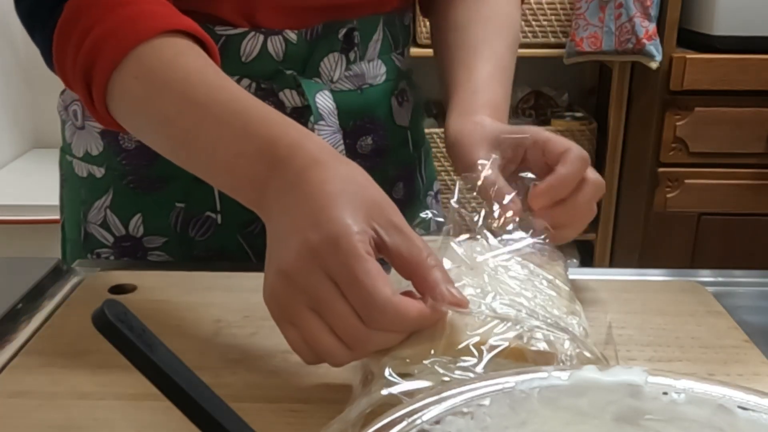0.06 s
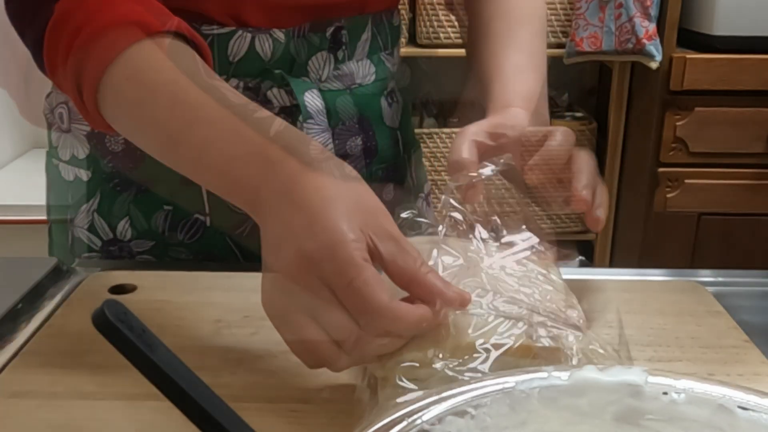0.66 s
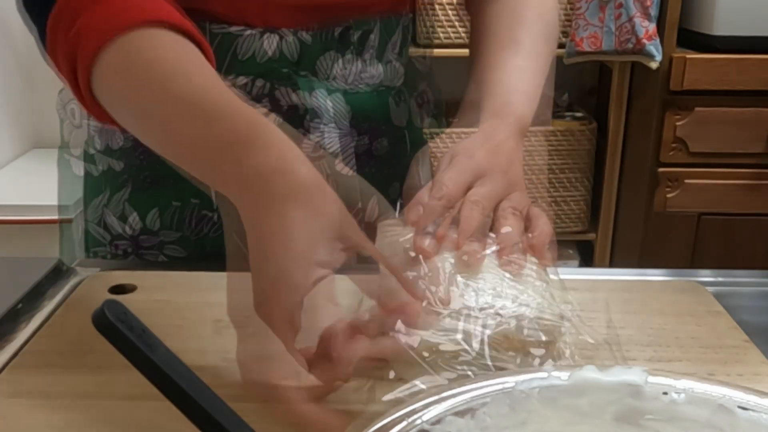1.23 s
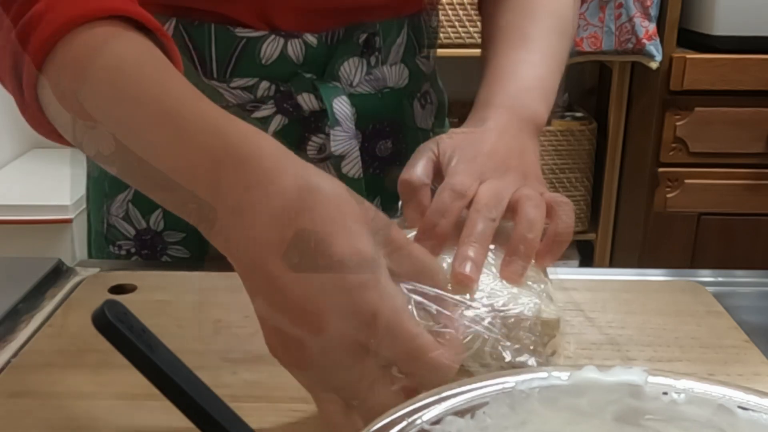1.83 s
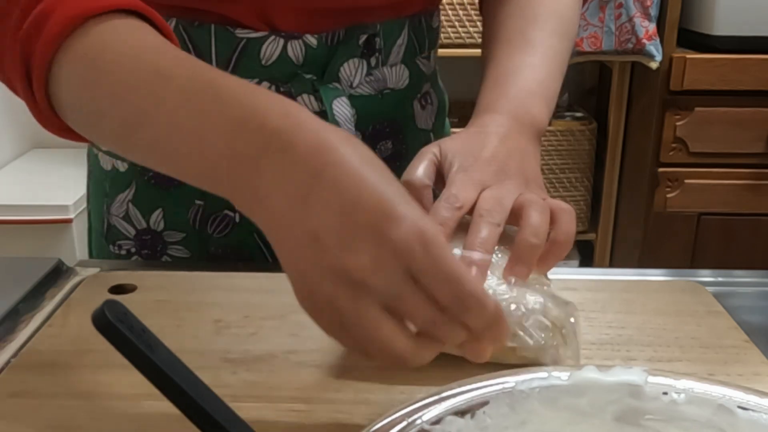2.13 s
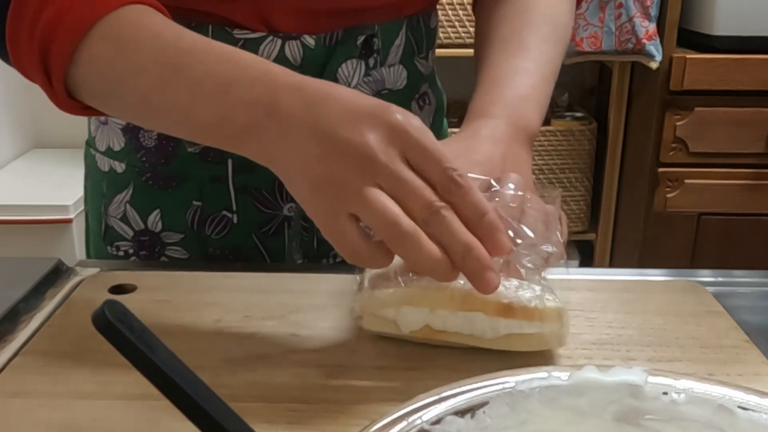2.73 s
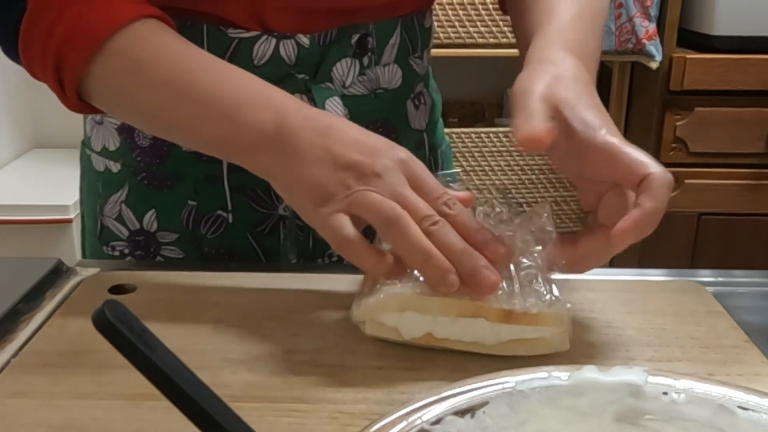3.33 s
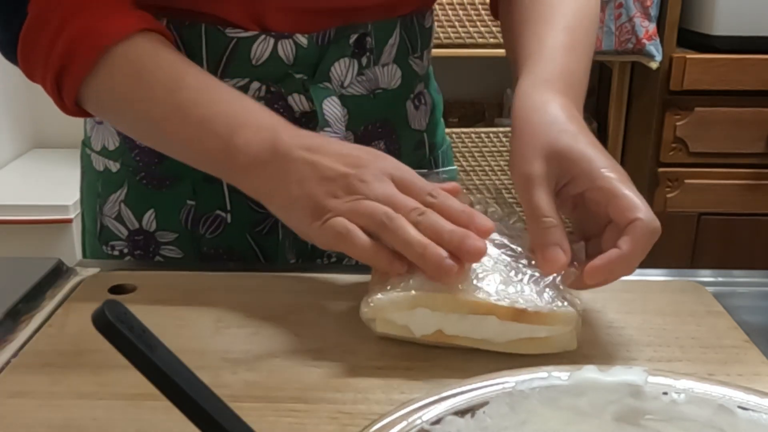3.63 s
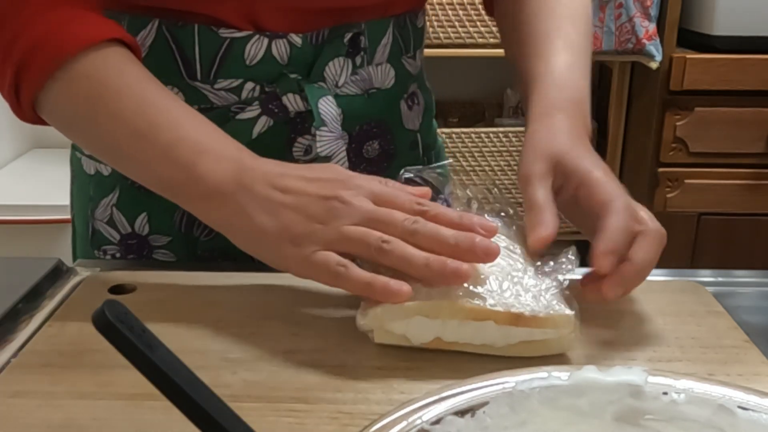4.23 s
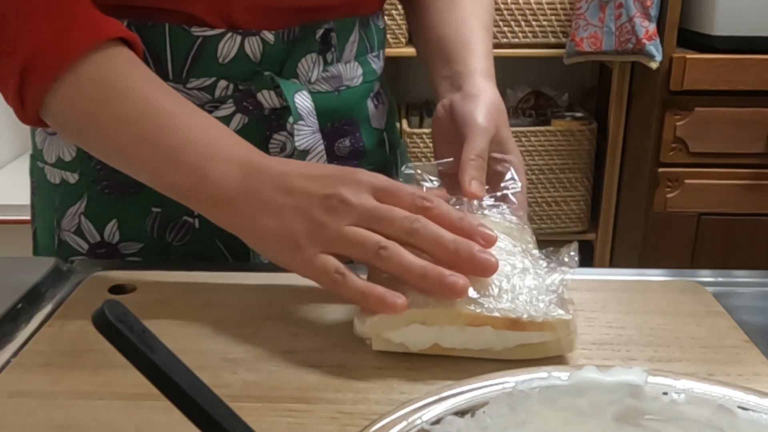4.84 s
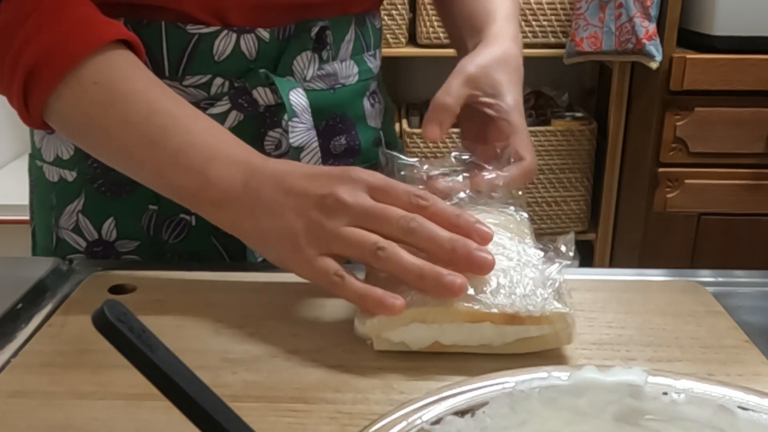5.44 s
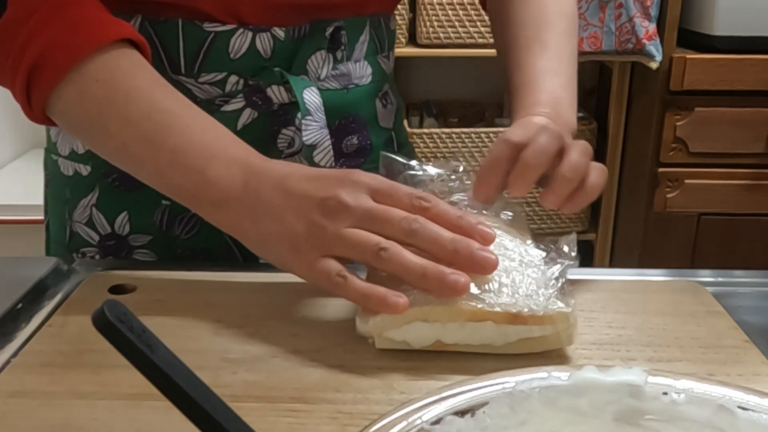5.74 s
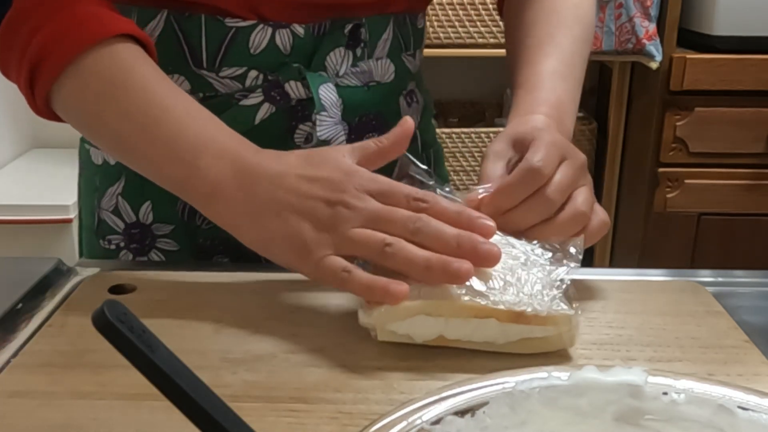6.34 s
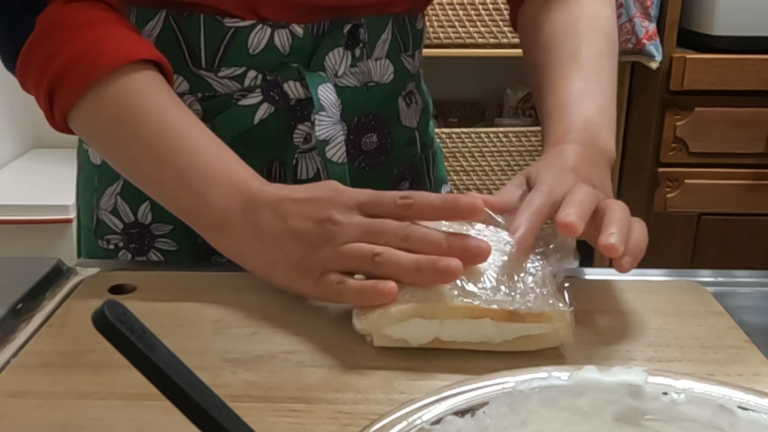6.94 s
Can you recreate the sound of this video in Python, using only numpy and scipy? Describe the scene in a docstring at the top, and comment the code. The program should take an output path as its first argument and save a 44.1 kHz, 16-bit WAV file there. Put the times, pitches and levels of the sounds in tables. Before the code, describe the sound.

Plastic cling film crinkles and snaps in uneven bursts as hands wrap a sandwich, over a steady low appliance hum.

```python
"""Wrapping a sandwich in cling film

A wooden board in a small kitchen, close up on a stereo pair. As the film is drawn tight, its creases
buckle in swarms of tiny clicks and sharper snaps, and the stretched sheet rings. Fingers rub and pat
the wrapped bread and shove it over the board. Behind it an appliance hums in the room's low rumble,
and the work table is nudged twice."""
import sys
import numpy as np
from scipy import signal
from scipy.fft import rfft, irfft, next_fast_len
from scipy.io import wavfile
from scipy.ndimage import uniform_filter1d

SR = 44100
rng = np.random.default_rng(int(sys.argv[2]) if len(sys.argv) > 2 else 0)


def bounce(signal):
    """Save signal as a 16-bit WAV file at the path given by the first command-line argument."""
    frames = np.transpose(np.atleast_2d(signal))
    limited = np.clip(frames, -1, 1)
    pcm = np.round(limited * 32767).astype(np.int16)
    wavfile.write(sys.argv[1], SR, pcm)


N = 308259
SPOTS = 4  # places on the parcel that sound, one signal row each


def film(level_db, body_db):
    """A harder pull buckles more creases; the sheet answers lower down, the finest fizz on top."""
    # How tight the wrap is. Each row: time in seconds, tension from 0 to 1.
    tension = [(0, 0.37), (1.9, 0.39), (2.8, 0.58), (3.6, 0.38), (4.8, 0.73), (6.9, 0.7)]
    # Added treble of the finest creases. Each row: time in seconds, gain in dB.
    fizz = [(0, -11), (.8, -4), (1.15, -8), (1.34, -17), (1.46, 3), (1.7, -8), (2.2, -11), (2.55, -8),
            (2.95, -13), (3.3, -11), (3.58, -2), (4.1, -19), (4.7, -13), (5.5, -9), (5.8, -10), (6.35, -18),
            (6.9, -5)]
    # Tone of the crinkle and the lower rustle, including the recorder's colouring.
    # Each row: frequency in Hz, gain in dB.
    crinkle_eq = [(1200, -15), (2300, -10.5), (3400, -0.5), (5000, -1.5), (5900, -1.5), (7600, 0),
                  (8200, -4.5), (10800, -3), (13500, -15), (15000, -49.5)]
    rustle_eq = [(400, -9), (700, -6.5), (900, -12.5), (1150, -7), (1400, -3.5), (1750, -5.5), (2400, -6.5),
                 (3600, -13)]
    # Resonances of the stretched film. Each row: frequency in Hz, width in Hz, gain in dB.
    taut_modes = [(1006, 59, -11), (1300, 42, 1.5), (1517, 82, -2), (1808, 68, -0.5), (2080, 310, -9.5),
                  (2470, 340, -4), (3340, 90, -4), (3580, 100, -1.5), (4520, 98, -1), (4650, 130, -1),
                  (5120, 310, 0.5)]
    usual_pull_db, creases_follow = -67, 0.55
    taut = in_time(tension)
    busy = from_db(creases_follow * (level_db - usual_pull_db))
    creases = swarm(500 * busy, spread_db=2, clump_db=5, low_hz=2000, high_hz=14300, cycles=3.6)
    # a few larger facets ring long enough to be heard one by one
    facets = swarm(45 * busy, spread_db=2, clump_db=3, low_hz=2080, high_hz=7930, cycles=9.5, count=27)
    fine = creases + from_db(4) * facets
    broad = swarm(600 * busy, spread_db=2.5, clump_db=4, low_hz=765, high_hz=3200, cycles=4.7)
    top = coloured(fine, [(6000, -30), (9500, 0)])
    crinkle = evened(coloured(fine + from_db(in_time(fizz)) * top, crinkle_eq))
    # slack film flaps broadly; stretched, it rings like a drumhead that the shifting grip detunes
    slack = rms_one(coloured(broad, rustle_eq))
    drum = sum((-1) ** k * from_db(db) * resonance(broad + fine, hz, width)
               for k, (hz, width, db) in enumerate(taut_modes))
    stretched = rms_one(wavering(drum, share=0.01596, rate_hz=7))
    body = evened((1 - taut) * slack + taut * stretched)
    # tension damps the crinkle a little and lifts the body
    return from_db(level_db - 0.95 * taut) * crinkle + from_db(body_db + 0.5 * taut) * body


def swarm(per_s, spread_db, clump_db, low_hz, high_hz, cycles, count=18):
    """Little avalanches of clicks, each click with its own size and one of `count` pitches."""
    chance = per_s * from_db(clump_db * drift(rate_hz=130)) / SR
    born = np.flatnonzero(rng.random(N) < chance)
    sizes = from_db(spread_db * np.minimum(rng.exponential(1, N)[born], 4))
    sizes *= rng.choice([-1, 1], N)[born]
    pitch_index = rng.integers(0, count, N)[born]
    out = np.zeros((SPOTS, N))
    for k, hz in enumerate(np.geomspace(low_hz, high_hz, count)):
        clicks = np.bincount(born, sizes * (pitch_index == k), N)
        out[k % SPOTS] += np.sqrt(hz) * buckle(clicks, hz, cycles)
    return out


def buckle(clicks, hz, cycles):
    """A facet flips and rings a few cycles; it radiates its speed, so no net air is moved."""
    return np.diff(ring(clicks, hz, cycles / hz), prepend=0) / (2 * np.sin(np.pi * hz / SR))


def big_snaps():
    """The big creases snap through one by one."""
    # Each row: start in seconds, peak at the film in dB, pitch in Hz, cycles of ringing.
    big_creases = [(0.0602, -45.5, 3700, 2), (0.1219, -37, 3920, 7.5), (0.2503, -40.5, 4200, 7),
                   (0.2996, -42, 5600, 2.5), (0.39, -37, 4230, 1.3), (0.3947, -34.5, 3680, 3.9),
                   (0.4213, -36, 4400, 3.7), (0.5085, -44.5, 6250, 4.6), (0.5195, -46, 5470, 4),
                   (0.5744, -43, 6700, 2.2), (0.6248, -51.5, 1300, 7), (0.6285, -49, 4700, 9.2),
                   (0.7243, -51.5, 2680, 3.5), (0.8663, -46, 1550, 1.8), (1.079, -49.5, 2000, 1.3),
                   (1.2186, -44.5, 5200, 1.2), (1.2625, -43, 6260, 1), (1.2966, -42, 5600, 1.6),
                   (1.3097, -61, 6400, 3), (1.3495, -41, 3100, 1.6), (1.428, -41, 3650, 3),
                   (1.466, -46, 6500, 2.3), (1.4788, -47, 5600, 0.76), (1.6106, -57, 2700, 1.5),
                   (1.6547, -42.5, 7200, 1.9), (1.78, -46.5, 2900, 2.2), (1.8393, -40, 2240, 2.2),
                   (2.0068, -47, 4700, 1.3), (2.3501, -33.5, 2570, 1.6), (2.4477, -56, 3570, 4),
                   (2.4922, -43, 3680, 2.5), (2.5604, -40, 3100, 2.5), (2.714, -49, 7100, 2.5),
                   (2.7423, -47.5, 6500, 1.3), (2.7859, -45.5, 1340, 4.5), (2.953, -47.5, 3200, 3),
                   (3.0412, -39.5, 3700, 3), (3.0418, -44.5, 6500, 9.3), (3.0857, -48, 5700, 1.8),
                   (3.1339, -39, 5000, 3.5), (3.2965, -44, 4020, 0.75), (3.3048, -50, 1350, 1.9),
                   (3.449, -50.5, 4600, 2.4), (3.479, -54.5, 5530, 3.4), (3.519, -57, 4000, 4.3),
                   (3.5538, -41.5, 3880, 11), (3.5792, -37.5, 3700, 9), (3.6572, -48, 4000, 1.9),
                   (3.707, -43, 7200, 2.7), (3.7273, -38.5, 5700, 5.7), (3.7377, -50, 5500, 4),
                   (4.0372, -45, 1620, 4), (4.0385, -42, 2700, 12), (4.1218, -44, 8400, 9),
                   (4.1624, -50, 5850, 1.4), (4.258, -42, 4300, 7.2), (4.2858, -38, 6040, 0.75),
                   (4.6272, -47, 3200, 6), (4.65, -43.5, 2570, 7.7), (4.824, -52, 5000, 5.3),
                   (4.855, -46, 2550, 8.7), (4.9197, -51, 2000, 7.4), (5.024, -44, 3600, 2.6),
                   (5.057, -52, 2380, 3), (5.254, -56.5, 1410, 9.4), (5.4574, -42, 4460, 6.6),
                   (5.547, -46.5, 6500, 5.6), (5.711, -51, 6700, 6.3), (5.6145, -44, 2470, 2.3),
                   (5.6376, -50, 4250, 3.3), (5.846, -44.5, 4850, 10), (5.8527, -49, 3800, 10),
                   (5.9286, -46, 4600, 1.8), (5.9633, -43.5, 4100, 3.5), (5.9874, -45.5, 2800, 3.4),
                   (6.0205, -48, 4360, 4.4), (6.0555, -46, 4080, 7.3), (6.1173, -47, 7300, 3.4),
                   (6.1625, -52, 6300, 4), (6.667, -46, 3580, 2.1), (6.8525, -51, 4430, 8.1),
                   (6.915, -49, 4870, 6.7), (6.944, -49, 2500, 4)]
    return snaps(big_creases)


def lesser_snaps(level_db, count=30, above_db=18.5, centre_hz=4600, cycles=2.3):
    """Lesser creases snap by chance, as strong as the pull, within an octave of the centre pitch."""
    return snaps([(when * N / SR, level_db[int(when * N)] + above_db,
                   centre_hz * 2 ** (2 * pitch - 1), cycles)
                  for when, pitch in rng.random((count, 2))])


def snaps(rows, size=2048):
    """Each crease gives one damped pulse; the lower its pitch, the softer its edge."""
    # Tone of the snaps, including the recorder's colouring. Each row: frequency in Hz, gain in dB.
    snap_eq = [(300, 3.5), (900, 0.5), (1400, 6.5), (2000, 1.5), (3700, -1), (7600, -2.5), (8200, -5.5),
               (12000, -5.5), (15000, -19)]
    out, click = np.zeros((SPOTS, N + size)), signal.unit_impulse(size)
    for k, (s, peak_db, hz, cycles) in enumerate(rows):
        softened = lowpass(buckle(click, hz, cycles), min(3.15 * hz, SR / 3))
        pulse = coloured(softened, snap_eq)
        at = int(s * SR)
        out[k % SPOTS, at:at + size] += from_db(peak_db) * pulse / np.abs(pulse).max()
    return out[:, :N]


def hands():
    """Levels in dB that drive crinkle, sheet body and finger rub; the strongest movement leads."""
    # Light handling between tugs. Each row: time in seconds, crinkle level in dB.
    handling = [(0, -82.5), (.055, -83.5), (.1, -73), (.3, -68), (.66, -76), (.93, -82.5), (1.3, -74.5),
                (1.52, -100), (2.25, -70), (2.85, -71), (3.1, -75), (3.4, -72), (3.46, -86), (3.51, -81),
                (3.7, -73.5), (4.2, -75.5), (4.33, -69.5), (4.44, -82.5), (4.48, -84.5), (4.72, -72),
                (5.36, -83), (5.6, -78.5), (5.7, -80), (5.78, -76), (6.3, -75), (6.6, -79), (6.7, -72.5),
                (6.99, -73.5)]
    # Tugs on the film. Each row: start, attack, length and release in seconds,
    # crinkle level in dB, then body and rub in dB relative to it.
    tugs = [(0.109, 0.023, 0.018, 0.17, -64, -3.5, -6), (0.202, 0.17, 0.1, .13, -62.5, -3.5, -7.5),
            (0.344, 0.071, 0.065, 0.16, -65, -3.5, -5.5), (0.435, .08, 0.14, 0.13, -70, -4, -7),
            (0.714, 0.037, 0.013, .09, -77, 0, 5), (0.766, .05, 0.02, 0.085, -70, -3, -3),
            (0.862, 0.05, 0.006, 0.037, -65.5, -3, -1), (0.989, 0.097, 0.075, 0.12, -74, -5, -10),
            (1.206, 0.088, .013, .14, -69.5, -3, -6), (1.34, 0.18, 0.013, 0.09, -61.5, -1.5, -4.5),
            (1.428, 0.14, 0.04, 0.058, -59.5, -3, -8), (1.579, 0.083, 0.025, 0.18, -75.5, 2, 1),
            (1.67, 0.075, 0.051, 0.088, -65.5, -5, -4), (1.777, 0.083, 0.089, .17, -69.5, -3, -2),
            (1.849, 0.027, 0.045, 0.06, -63, -2, -4.5), (1.968, 0.069, 0.035, 0.32, -68.5, 0, 2.5),
            (2.092, 0.24, 0.073, 0.46, -64, -2.5, -5.5), (2.365, .04, 0.08, 0.32, -65, -4.5, -4),
            (2.5, .08, 0.14, .17, -69, -3.5, -5), (2.745, 0.026, 0.082, 0.16, -67, -4, -10),
            (3.304, 0.044, 0.1, 0.13, -69, -9.5, -9), (3.519, .035, 0.019, 0.045, -66, -7, -7),
            (3.549, .03, 0.033, 0.13, -60.5, -4, -8), (3.615, .08, 0.076, 0.45, -64.5, -8, -20),
            (3.774, 0.11, 0.027, 0.11, -65, -6, -18), (3.851, 0.12, 0.021, 0.18, -66, -4, -12),
            (3.919, .08, 0.15, 0.14, -69, -6.5, -15), (4.275, 0.017, 0.014, 0.1, -59.5, -7, -9.5),
            (4.491, 0.045, 0.008, 0.07, -74, -4, 1.5), (4.549, .04, 0.011, 0.16, -74, -3, -7),
            (4.627, 0.065, 0.017, 0.39, -66.5, 0.5, -0.5), (4.847, 0.056, 0.033, 0.14, -70.5, 2.5, -3),
            (4.923, .08, 0.19, 0.44, -69, -1.5, -6), (5.201, 0.045, 0.065, 0.23, -67.5, -1.5, -6.5),
            (5.435, 0.17, 0.055, 0.16, -66.5, 0, -8.5), (5.545, 0.059, 0.087, 0.15, -70.5, -2.5, -7),
            (5.833, 0.12, 0.027, 0.28, -69, 0, -2.5), (5.9, .08, 0.14, 0.1, -72, -1.5, -7),
            (6.15, 0.084, 0.086, 0.16, -66.5, -1.5, -9), (6.222, .08, 0.018, .1, -67, -3, 2),
            (6.896, .08, 0.041, .17, -70, -3.5, -11)]
    levels = in_time(handling) + [[0], [-5.5], [-6]]  # crinkle, body, rub
    for start, attack, length, release, level_db, body_db, rub_db in tugs:
        tug_db = level_db + stroke(start, length, attack, release)
        levels = np.maximum(levels, tug_db + [[0], [body_db], [rub_db]])
    return levels + drift(rate_hz=22.254)  # unsteady by about 1 dB


def stroke(start, length, attack=0.055, release=0.24):
    """Level in dB of one hand movement: a rise up to its start, a hold that builds, a release."""
    times = [start - attack, start, start + length, start + length + release]
    return np.interp(np.arange(N) / SR, times, [-40, -1.5, 0, -40], left=-np.inf, right=-np.inf)


def fingers(level_db):
    """Skin sticks and slips on the film; the soft bread keeps it dull."""
    # Tone of the wrapped bread. Each row: frequency in Hz, gain in dB.
    parcel_tone = [(150, -8), (300, 2), (400, 0.5), (510, 2.5), (620, -6.5), (800, -17.5), (1400, -31)]
    slips = swarm(350, spread_db=5, clump_db=1, low_hz=212, high_hz=1220, cycles=4.4, count=12)
    return from_db(level_db) * evened(coloured(slips, parcel_tone))


def pats(mode_ratio=2.9, size=4096):
    """A fingertip lands on the soft parcel: a dull knock of two short modes."""
    # Each row: start in seconds, strength in dB, pitch of the lower mode in Hz.
    landings = [(0.4725, -48.5, 900), (0.866, -49, 580), (1.122, -56, 570), (1.264, -54, 534),
                (1.395, -50, 470), (1.426, -50, 580), (1.71, -49.5, 490), (1.8415, -43, 337),
                (1.872, -44, 387), (1.988, -49, 444), (2.185, -48.5, 366), (2.35, -44.5, 457),
                (2.414, -56, 480), (2.625, -59, 460), (2.71, -55, 440), (2.786, -54, 480),
                (3.042, -66, 530), (3.579, -39.5, 870), (3.683, -59, 480), (4.279, -53, 473),
                (5.615, -47.5, 476), (5.892, -57, 395), (6.223, -56, 440), (6.232, -51, 514)]
    out, click = np.zeros((SPOTS, N + size)), signal.unit_impulse(size)
    for k, (s, db, hz) in enumerate(landings):
        knock = buckle(click, hz, cycles=4.3) + buckle(click, hz * mode_ratio, cycles=2.1)
        at = int(s * SR)
        out[k % SPOTS, at:at + size] += from_db(db) * lowpass(knock, hz=1300)
    return out[:, :N]


def slide():
    """The parcel judders across the wood, and the board answers with a low murmur."""
    # Each row: start in seconds, length in seconds, level in dB.
    shoves = [(0.07, 0.16, -63.5), (1.825, 0.022, -67.5), (4.275, 0.022, -69)]
    # The board's two low modes in Hz.
    board_hz = [200, 248]
    push = sum(from_db(db + stroke(start, length)) for start, length, db in shoves)
    judder = rng.standard_normal((SPOTS, N))
    board = sum(resonance(judder, hz, width_hz=7.1) for hz in board_hz)
    return push * evened(lowpass(board, hz=400), size=4096)


def kitchen(spots):
    """Each spot reaches the pair directly and in echoes off the hands, the furniture and the room."""
    heard = 0
    for x, pan_db in zip(spots, np.linspace(-0.37, 0.37, SPOTS)):
        near = reflections(level_db=-2.5, delay_s=0.00039, t60=0.015)
        furniture = reflections(level_db=-1, delay_s=0.0029, t60=0.037)
        room = reflections(level_db=-5, delay_s=0.008, t60=0.21)
        response = near + furniture + room
        response[:, 0] += from_db([pan_db, -pan_db])  # direct path
        heard = heard + signal.oaconvolve(x[None], uncoloured(response), axes=1)[:, :N]
    return heard


def reflections(level_db, delay_s, t60, size=16384):
    """A burst of scattered echoes arrives after a delay and dies away."""
    t = np.arange(size) / SR
    echoes = diffuse(size) * from_db(-60 * t / t60) * (t > delay_s)
    return from_db(level_db) * rms_one(echoes) / np.sqrt(size)


def diffuse(size):
    """Stereo noise from all round: alike in the bass, less so in the treble."""
    # Each row: frequency in Hz, left-right likeness from 0 to 1.
    likeness = [(25, 0.99), (60, 1), (150, 1), (300, 0.99), (600, 0.79), (1200, 0.34), (2500, 0.57),
                (4500, 0.72), (9000, 0.66), (11500, .03)]
    alike = at_hz(likeness, size)
    mid, side = rfft(rng.standard_normal((2, size)))
    return irfft(np.sqrt((1 + alike) / 2) * mid + np.sqrt((1 - alike) / 2) * side * [[1], [-1]], size)


def microphones(x):
    """The two microphones hear unequally, most of all in the high treble."""
    # Each row: frequency in Hz, left minus right in dB.
    balance = [(300, 1.5), (900, -2.5), (1300, 0), (2000, 1), (3500, -0.7), (6000, 0.5), (9000, 1),
               (11000, 1), (12500, 7.5), (15000, 2)]
    size = next_fast_len(2 * (N // 2) + 4096)
    half_db = at_hz(balance, size) / 2
    return irfft(rfft(x, size) * from_db([half_db, -half_db]), size)[:, :N]


def table():
    """The nudged table sways with a deep, soft thud."""
    # Each row: start in seconds, level in dB, pitch in Hz, seconds to fall 60 dB.
    nudges = [(1.27, -57, 32.2, 1), (4.296, -41.5, 36.2, 0.59)]
    return sum(from_db(db) * ring(signal.unit_impulse(N, int(s * SR)), hz, t60)
               for s, db, hz, t60 in nudges)


def appliance(hum_hz=97.96):
    """A motor drones on one low tone; faint wavering neighbours make it throb."""
    # The main tone sinks and swells. Each row: time in seconds, RMS level in dB.
    hum = [(0, -46.5), (.3, -46), (1.03, -54), (1.35, -54), (1.56, -49.5), (1.81, -49), (2.1, -47.5),
           (3.4, -47), (6.4, -47), (6.99, -45.5)]
    # Each row: frequency in Hz, RMS level in dB.
    weak_tones = [(87.1, -70), (106.5, -75.5), (263.8, -76), (473, -86.5)]
    t = np.arange(N) / SR
    drone = from_db(in_time(hum)) * np.sin(2 * np.pi * hum_hz * t + 0.16 * drift(rate_hz=13))
    for hz, db in weak_tones:
        unsteady_t = t + 0.0022 * drift(rate_hz=3)
        drone += from_db(db) * np.sin(2 * np.pi * hz * unsteady_t + rng.uniform(0, 2 * np.pi))
    return np.sqrt(2) * drone


def room_air(level_db):
    """Room tone: a steady low rumble with a trace of hiss."""
    # Each row: frequency in Hz, relative level in dB.
    air_tone = [(20, -8), (36, 4), (65, -3.5), (97, 5.5), (135, -1.5), (175, -8.5), (215, -4), (275, -3),
                (330, -12), (480, -24.5), (750, -50), (1000, -31.5), (1500, -44.5), (6000, -38),
                (14000, -50.5)]
    return from_db(level_db) * rms_one(coloured(diffuse(N), air_tone))


def from_db(db):
    """Decibels as amplitude."""
    return 10 ** (np.asarray(db) / 20)


def rms_one(x):
    """The signal scaled to an RMS of 1."""
    return x / np.sqrt(np.mean(x ** 2) + 1e-20)


def in_time(rows):
    """A curve of (seconds, value) read at every sample."""
    return np.interp(np.arange(N) / SR, *np.transpose(rows))


def at_hz(points, size):
    """A curve of (Hz, value) read at every bin of an FFT."""
    hz, value = np.transpose(points)
    return np.interp(np.log(np.arange(size // 2 + 1) * SR / size + 1), np.log(hz), value)


def coloured(x, spectrum, size=4096):
    """Minimum-phase filter with the given spectrum: nothing sounds early."""
    cepstrum = irfft(np.log(from_db(at_hz(spectrum, size))))
    cepstrum[1:size // 2] *= 2
    cepstrum[size // 2 + 1:] = 0
    response = irfft(np.exp(rfft(cepstrum)))
    return np.apply_along_axis(signal.oaconvolve, -1, x, response)[..., :x.shape[-1]]


def uncoloured(response, size=64):
    """The same echoes with no broad colour of their own."""
    power = uniform_filter1d(np.abs(rfft(response.mean(axis=0))) ** 2, size)
    hz = np.linspace(1, SR / 2, len(power))
    return coloured(response, np.transpose([hz, -10 * np.log10(power / power.mean())]))


def lowpass(x, hz):
    """A gentle two-pole treble cut."""
    return signal.lfilter(*signal.butter(2, hz, fs=SR), x)


def resonance(x, hz, width_hz):
    """One mode passes a narrow band."""
    return signal.lfilter(*signal.iirpeak(hz, hz / width_hz, fs=SR), x)


def ring(clicks, hz, t60):
    """A unit click starts a sine of height 1 that falls 60 dB in t60 seconds."""
    r, w = from_db(-60 / (t60 * SR)), 2 * np.pi * hz / SR
    return signal.lfilter([0, np.sin(w)], [1, -2 * r * np.cos(w), r * r], clicks + 1e-18)


def drift(rate_hz):
    """A random wander with an RMS of 1."""
    knots = rng.standard_normal(N // 20)
    return rms_one(np.interp(np.arange(N) / SR * rate_hz, np.arange(len(knots)), knots))


def wavering(x, share, rate_hz):
    """All pitches stray up and down together by about this share."""
    n, sway = np.arange(N), drift(rate_hz)
    read_at = n + share * sway / np.std(np.diff(sway))
    return np.array([np.interp(read_at, n, row) for row in x])


def evened(x, size=1536):
    """Total power held near 1 over `size` samples, with single clicks left standing."""
    power = uniform_filter1d(uniform_filter1d(np.sum(x ** 2, axis=0), size), size // 2)
    return x / np.sqrt(np.abs(power) + np.mean(power) / 1000)


def scene():
    """Film, hands and board sound in the kitchen, over the hum and the room's rumble."""
    crinkle_db, body_db, rub_db = hands()
    rustle = film(crinkle_db, body_db) + fingers(rub_db) + slide()
    wrapping = rustle + big_snaps() + lesser_snaps(crinkle_db) + pats()
    return microphones(kitchen(wrapping)) + table() + appliance() + room_air(level_db=-60.5)


def record(dry, cutoff_hz=15400):
    """The top is cut steeply."""
    return signal.sosfilt(signal.ellip(10, 0.2, 80, cutoff_hz, fs=SR, output="sos"), dry)


dry = scene()
out = record(dry)
bounce(out)
```